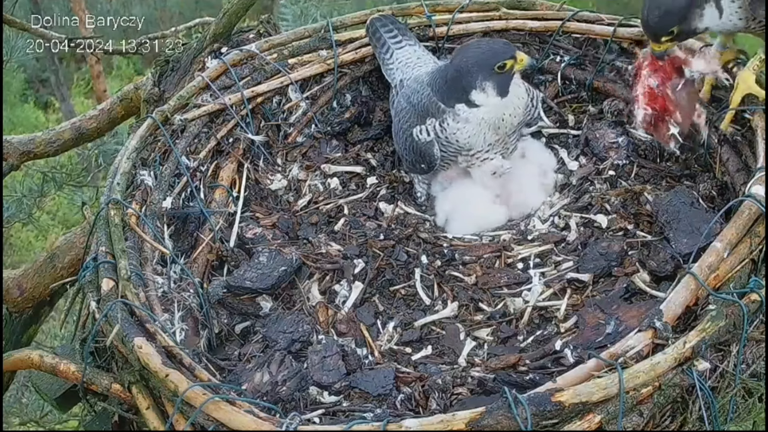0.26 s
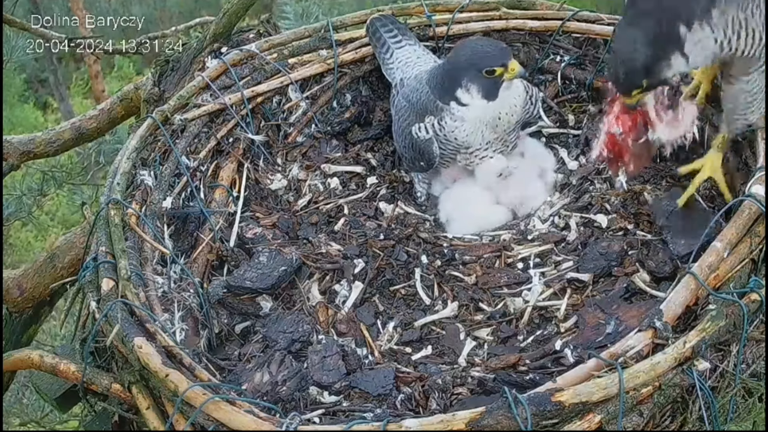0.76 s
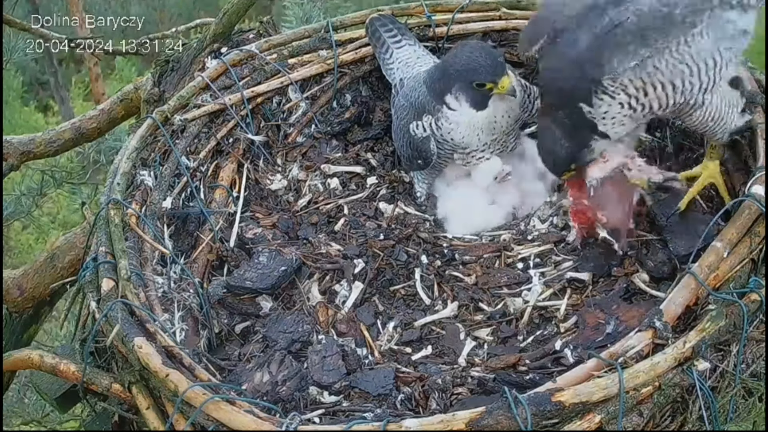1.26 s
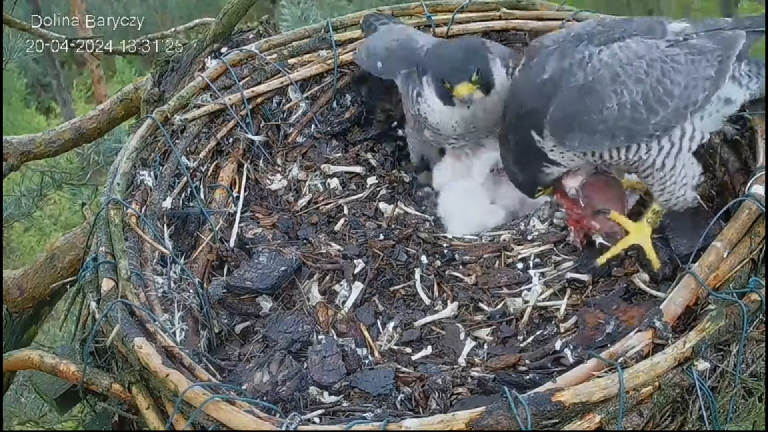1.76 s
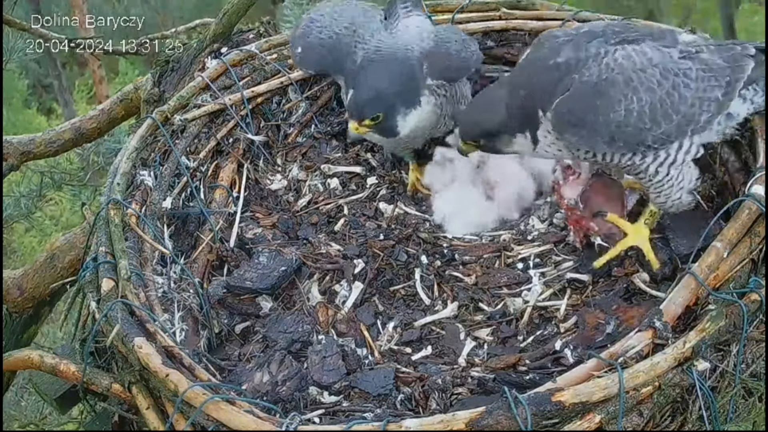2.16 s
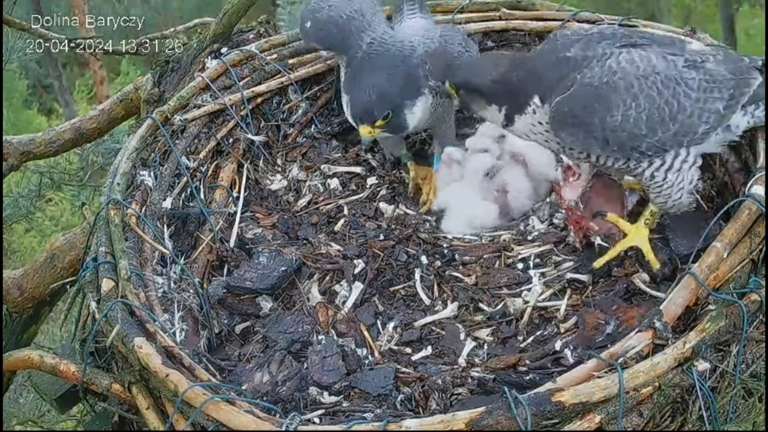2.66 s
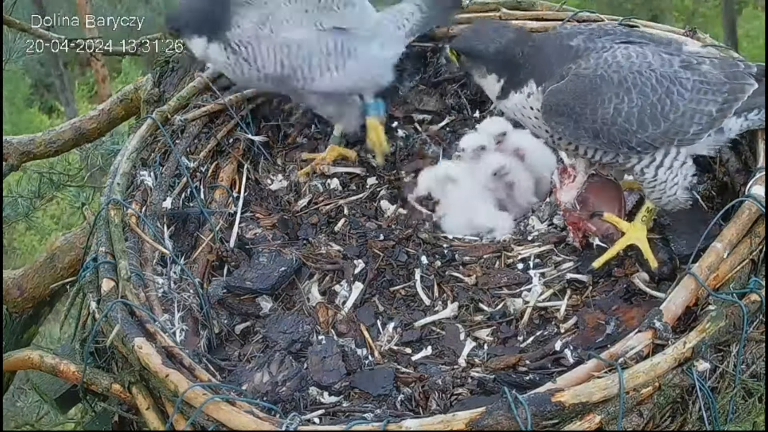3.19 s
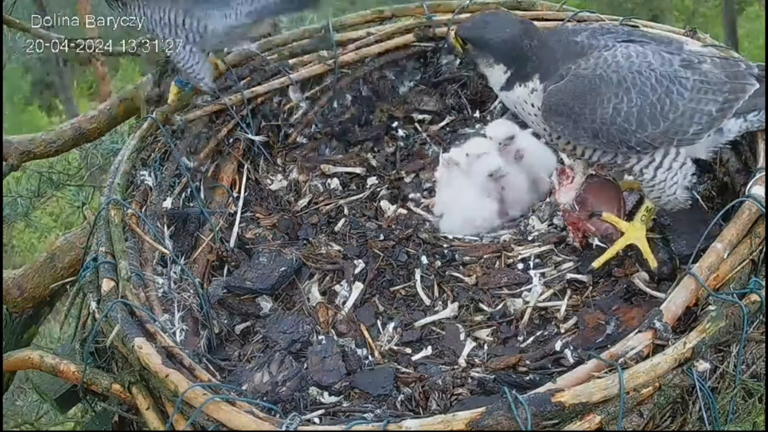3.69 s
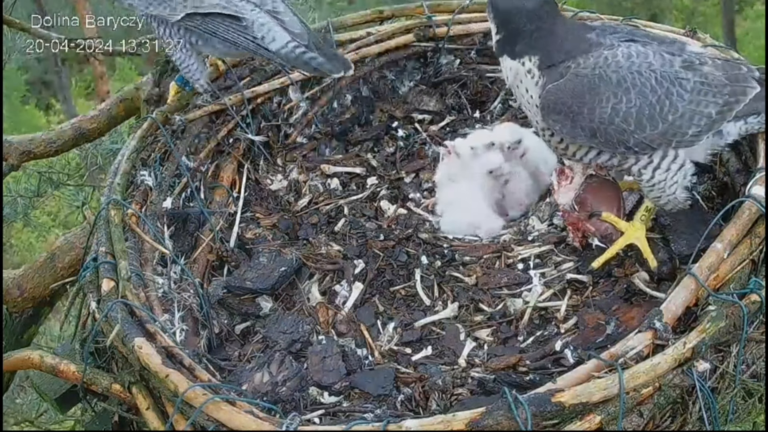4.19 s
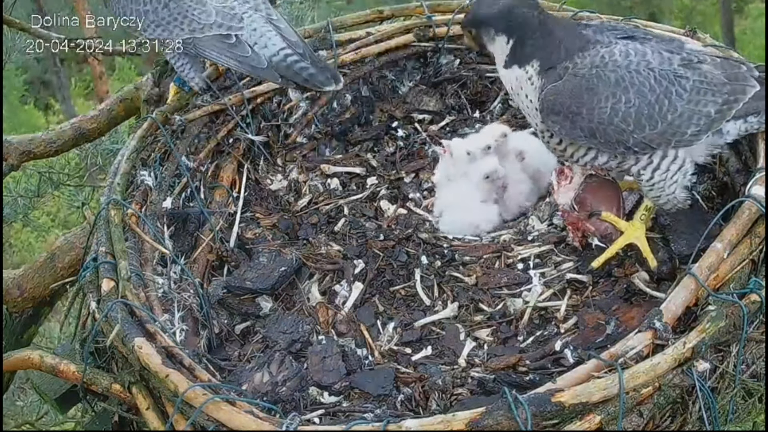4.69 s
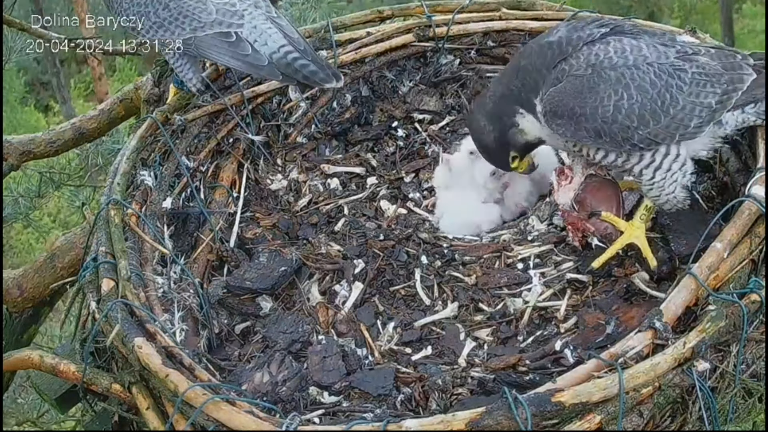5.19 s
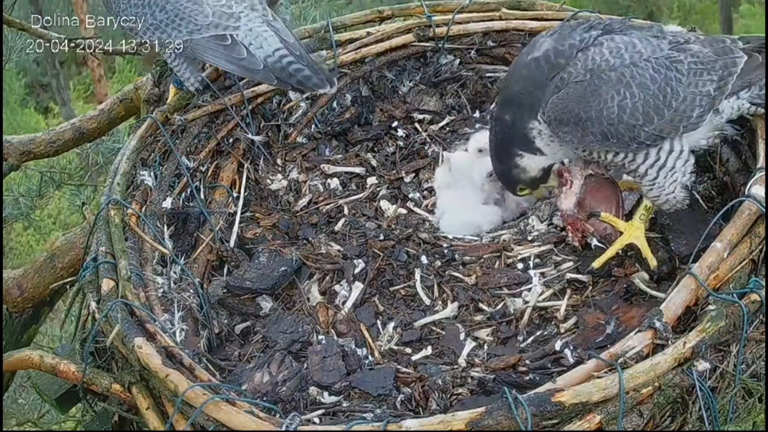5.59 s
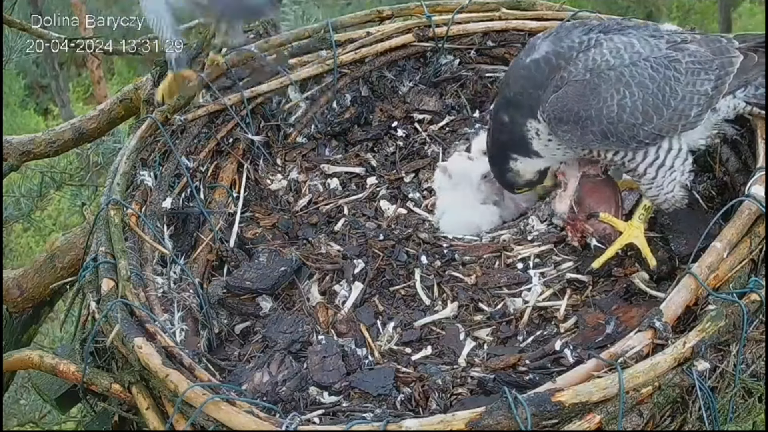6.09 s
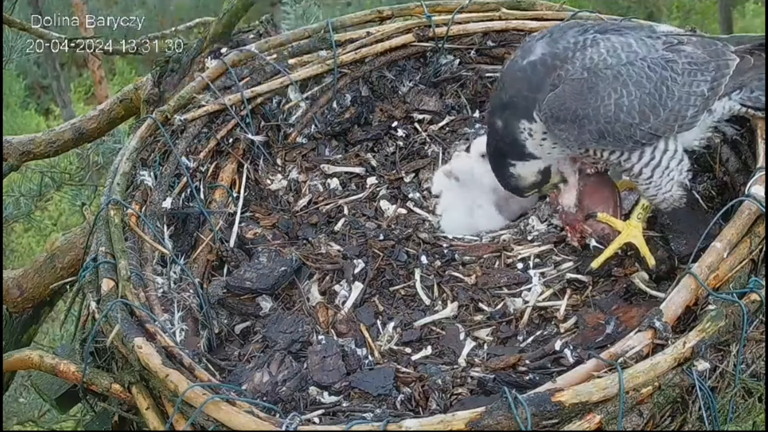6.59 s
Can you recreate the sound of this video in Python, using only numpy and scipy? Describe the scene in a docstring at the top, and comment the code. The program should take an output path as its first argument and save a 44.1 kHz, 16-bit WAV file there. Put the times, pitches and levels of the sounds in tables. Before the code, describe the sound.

Rapid, piercing raptor cries come first, alternating squeaky yelps and low raspy barks, with a soft wail starting among them. After about two seconds the loud calling stops, leaving faint peeps from downy chicks, drooping plaintive whines and a brief feathery rustle. Lumpy wind rumbles and buffets an exposed outdoor microphone near the start and again towards the end, over still, quiet woodland air.

```python
"""Two adult falcons meet at a treetop stick nest: eight sharp calls join thin squeaks, plunging yelps, low barks and creaks.
Harmonic oscillators with unsteady pitch and level make the voices; separate pulses ringing a throat make the creaks.
Four soft long wails, the first beginning among the calls, waver; chicks peep faintly, their pitch bending up or down.
Filtered noise makes brief ticks and longer wing swishes, the lumpy wind and the still air; pressure swings add buffets.
The forest returns a faint echo by convolution with bright scatter and sparse random reflections."""
import sys
import numpy as np
from scipy import signal
from scipy.fft import rfft, irfft
from scipy.io import wavfile
from scipy.ndimage import uniform_filter1d

SR = 44100
rng = np.random.default_rng(int(sys.argv[2]) if len(sys.argv) > 2 else 0)


def unload_audio(sound):
    """Save the sound as a 16-bit wav file, at the path given as the first command line argument."""
    columns = np.transpose(np.atleast_2d(sound))
    # keep every value between -1 and 1, then stretch to whole-number steps
    steps = np.round(np.clip(columns, -1, 1) * 32767)
    wavfile.write(sys.argv[1], SR, steps.astype(np.int16))


N = 302083
TIME = np.arange(N) / SR
CUTOFF_HZ = 15900   # upper limit of the sound

# single pressure swings of air, each with a turbulent wake: time_s, peak_db, pitch_hz, wake_s
BUFFETS = [(0.983, -18.5, 89, .02), (1.437, -35, 138, 0.016), (1.859, -28.5, 70.2, 0.029),
           (1.898, -31.5, 135.6, .03), (2.395, -35.5, 178.9, 0.024), (2.5, -47, 70.2, .12),
           (3.146, -40, 89.5, 0.11), (3.639, -44.5, 109, .014), (4.11, -48, 49.6, 0.062),
           (4.369, -47, 49.7, 0.037), (5.049, -41.5, 79, 0.059), (5.208, -32, 120.3, .03),
           (5.279, -29.5, 188, .02), (5.379, -27.5, 138, .03), (5.569, -26, 143, 0.041),
           (5.73, -25.5, 108.3, .05), (6.031, -20.5, 127.5, .02), (6.26, -20.5, 92, 0.017),
           (6.35, -24.5, 149, 0.036), (6.433, -24, 142, 0.035)]


def from_db(db):
    """Amplitude ratio from the logarithmic decibel scale."""
    return 10 ** (np.asarray(db) / 20)


def rms_one(x):
    """Normalization of a signal to unit mean power."""
    return x / np.sqrt(np.mean(x ** 2) + 1e-20)


def in_time(rows):
    """Linear interpolation of each column of a curve at every sample."""
    s, *columns = np.transpose(rows)
    return [np.interp(TIME, s, column) for column in columns]


def at_hz(points, hz):
    """Spectral gain, interpolated in decibels over logarithmic frequency."""
    f, db = np.transpose(points)
    return from_db(np.interp(np.log(np.maximum(hz, 1)), np.log(f), db))


def response(points, size=4096):
    """Minimum-phase impulse response: folding the cepstrum makes the given spectrum causal."""
    cepstrum = irfft(np.log(at_hz(points, np.fft.rfftfreq(size, 1 / SR))))
    fold = 1 + np.sign(size // 2 - np.arange(size))
    fold[0] = 1
    return irfft(np.exp(rfft(cepstrum * fold)))


def noise(points):
    """Coloured noise of unit power: white noise shaped by a linear filter."""
    colour = response(points)
    white = rng.standard_normal(N + len(colour) - 1)
    return rms_one(signal.fftconvolve(white, colour, "valid"))


def flutter(rate_hz, count, warm_up=4000):
    """Band-limited random modulation: low-passed noise wavers about as fast as the cutoff."""
    low = signal.butter(2, rate_hz, fs=SR, output="sos")
    return rms_one(signal.sosfilt(low, rng.standard_normal(count + warm_up)))[warm_up:]


def fading(count, depth_db, rate_hz):
    """Random amplitude modulation: a gain swells and sinks in decibels."""
    return from_db(depth_db * flutter(rate_hz, count))


def gate(t, start, end, edge):
    """Smooth onset and decay: a product of two tanh steps."""
    opening = 1 + np.tanh((t - start) / edge)
    closing = 1 - np.tanh((t - end) / edge)
    return opening * closing / 4


def syrinx(notes, edge_s, edge_share, jitter, shimmer, rough_hz, rasp_db, half_db, sag_db=20):
    """Harmonic oscillation: irregular vibration shakes pitch and level, adds subharmonics and lets air rasp.

    Note columns: start_s, first_part_s, second_part_s, start_hz, turn_hz, end_hz,
    start_db, turn_db, end_db, overtone_db, roughness. sag_db is overtone gain per octave of sag.
    """
    # how throat and beak pass overtones: frequency_hz, gain_db
    overtones = [(3400, -7), (3850, -5.5), (4350, -14.5), (5000, -19), (5850, -20), (6500, -26.5),
                 (7800, -37), (8700, -44), (11000, -59.5), (16000, -63)]
    # colour of the rasping air and of the half harmonics: frequency_hz, gain_db
    rasp = [(200, -14), (1200, -12), (2500, 7.5), (3900, 4.5), (4700, 0.5), (6000, -9), (8000, -15.5),
            (11000, -29), (16000, -37)]
    voice, air = np.zeros(N), np.zeros(N)
    for start, first, second, hz0, hz1, hz2, db0, db1, db2, overtone_db, rough in notes:
        turn, end = start + first, start + first + second
        span = (TIME > start - .04) & (TIME < end + .04)
        t = TIME[span]
        count = len(t)
        # after the turn the pitch moves quickly, then settles
        settle = 1 - np.interp(t, [turn, end], [1, 0]) ** 2
        hz = np.interp(t, [start, turn], [hz0, hz1]) + (hz2 - hz1) * settle
        shaken_hz = hz * (1 + jitter * rough * flutter(rough_hz, count))
        phase = 2 * np.pi * np.cumsum(shaken_hz) / SR
        opening = gate(t, start, end, edge_s + edge_share * (end - start))
        # overtones need a fully open voice, and each wavers on its own
        upper = np.zeros(count)
        for k in range(2, 8):
            gain = at_hz(overtones, k * hz) * (k * hz < CUTOFF_HZ)
            upper += gain * fading(count, depth_db=3.5, rate_hz=70) * np.sin(k * phase)
        # alternate cycles differ, which puts lines between the harmonics
        between = sum(at_hz(rasp, k * hz / 2) / k * np.sin(k * phase / 2) for k in (1, 3))
        half = rough * from_db(half_db) * fading(count, depth_db=6.0, rate_hz=67) * between
        level = from_db(np.interp(t, [start, turn, end], [db0, db1, db2])) * opening
        # overtones strengthen where the pitch lies below that of the turn
        harsh_db = sag_db * np.clip(np.log2(hz1 / hz), 0, 1)
        wave = np.sin(phase) + half + from_db(overtone_db + harsh_db) * opening * upper
        voice[span] += level * wave * (1 + shimmer * rough * flutter(rough_hz, count))
        air[span] += level * rough
    return voice + from_db(rasp_db) * air * noise(rasp)


def squeak(start, length, hz, db, overtone_db):
    """Frequency glide: rising pitch makes a thin note that is loudest at its turn."""
    turn, rise = .55, .11   # shares of the length and of the pitch
    swell_db, fade_db, rough = 2.5, 4.5, .16
    return (start, turn * length, (1 - turn) * length, hz, hz * (1 + rise * turn), hz * (1 + rise),
            db - swell_db, db, db - fade_db, overtone_db, rough)


def yelp(start, length, hz, db, overtone_db, rough):
    """Register break: the pitch plunges while the level swells, then both hold."""
    drop_ratio, turn, swell_db = 1.2, .5, 9   # turn is a share of the length
    return (start, turn * length, (1 - turn) * length, drop_ratio * hz, hz, hz,
            db - swell_db, db, db, overtone_db, rough)


def bark(start, length, hz, end_hz, db, fade_db, overtone_db, rough, split_db):
    """Onset, sustain and breakup: a soft start, a held sagging voice and a brief inharmonic tone."""
    hold = .59 * length   # before the pitch sags
    swell_db_per_s = 171.5
    # each half of the soft start, with level relative to the bark
    lead_s, lead_swell_db, lead_rough = .006, 6.5, .35
    lead_db = db - 22
    lead = (start - 2 * lead_s, lead_s, lead_s, hz, hz, hz,
            lead_db - lead_swell_db, lead_db, lead_db + lead_swell_db, overtone_db, lead_rough)
    body = (start, hold, length - hold, hz, hz, end_hz,
            db - swell_db_per_s * hold, db, db - fade_db, overtone_db, rough)
    # each half of the closing tone between the harmonics
    split_s, split_fade_db, split_overtones_db, split_rough = .0058, 4.5, -11, .38
    split_hz = 1.47 * end_hz
    split = (start + length - 2 * split_s, split_s, split_s, split_hz, split_hz, split_hz,
             split_db - split_fade_db, split_db, split_db - split_fade_db, split_overtones_db, split_rough)
    return [lead, body, split]


def sharp_calls():
    """Register jumps: one harmonic oscillator passes between squeak, yelp and bark."""
    # thin rising lead-ins: start_s, length_s, start_pitch_hz, level_db, overtones_db
    squeaks = [(0.0, 0.019, 3770, -28, 12.5), (0.438, 0.013, 3474, -24.5, 3),
               (0.972, 0.017, 3350, -24, 6.5), (1.663, 0.038, 3332, -28.5, 9), (2.153, 0.06, 3040, -21, 0)]
    # plunging voice breaks: start_s, length_s, landing_pitch_hz, level_db, overtones_db, roughness
    yelps = [(.025, 0.0062, 2830, -20, -.5, 0.52), (0.466, 0.006, 3100, -8.5, -1, 0.23),
             (.999, 0.012, 2950, -7, 7.5, 0.19), (1.706, 0.0061, 2876, -8.5, -1.5, 0.3),
             (2.203, 0.015, 2747, -9, 1.5, .13)]
    # low voice that holds, sags and splits: start_s, length_s, pitch_hz, end_pitch_hz, level_db,
    # fade_db, overtones_db, roughness, split_tone_db
    barks = [ (.028, 0.014, 1952, 1746, -17.5, 6, -1, 0.05, -18.5),
             (.250, 0.056, 2143, 1850, -9, 5.5, -5, 0.08, -26),
             (0.472, .022, 1966, 1844, -8, 7, -1, .17, -28.5),
             (0.74, 0.055, 2166, 1768, -6, 11, -9, .14, -36.5),
             (1.007, 0.021, 2023, 1832, -7.5, 3.5, -10.5, 0.54, -17),
             (1.319, .038, 2157, 1926, -10.5, -1.5, -4.5, .12, -14),
             (1.712, 0.019, 1900, 1782, -7.5, 3.5, -8.5, 0.21, -14),
             (2.217, 0.012, 1752, 1640, -12, 1.5, 2.5, 0.2, -21)]
    notes = [squeak(*row) for row in squeaks] + [yelp(*row) for row in yelps]
    for row in barks:
        notes += bark(*row)
    return syrinx(notes, edge_s=.0015, edge_share=.008, jitter=.09, shimmer=.15, rough_hz=596,
                  rasp_db=-12.0, half_db=-7.5)


def creaks(unevenness=.059, scatter_db=-1.5, rasp_db=-17, puff_s=.0013, soft_hz=3800):
    """Pulse excitation of a resonator: a slack membrane's separate pulses and puffs ring the throat."""
    # creaks that open or close a call: start_s, length_s, relative_level_db, slowing_octaves
    creak_rows = [(0.041, 0.019, -14.5, 0.98), (0.2213, .018, -17, 0), (0.303, .018, -11.5, .68),
                  (0.492, .019, -12.5, .85), (0.709, 0.018, -12, 0.11), (1.027, .013, -17, 0.54),
                  (1.358, 0.023, -12.5, .6), (1.729, .019, -15, 0.61), (2.23, 0.022, -11.5, 0.89)]
    # how the throat colours pulses and puffs: frequency_hz, gain_db
    creak_colour = [(120, -24.5), (330, 5), (520, -7.5), (750, -1.5), (1550, 3), (1950, -0.5), (2600, 2),
                    (3300, -13.5), (4000, -13), (4800, -26), (7000, -37.5), (16000, -56)]
    mid_rate_hz, fade_db_per_octave = 345, 16.5   # a slackening membrane pulses slower and weaker
    first_db = -7.5   # the first pulse is softer
    clicks = np.zeros(N)
    for start, length, db, slowing in creak_rows:
        s, end = start, start + length
        for slip, force in rng.standard_normal((16, 2)):
            slack = np.interp(s, [start, end], [0, slowing])
            if s < end:
                pulse_db = db + first_db * (s == start) - fade_db_per_octave * slack + scatter_db * force
                clicks[round(s * SR)] = from_db(pulse_db)
            s += np.exp(unevenness * slip) / (mid_rate_hz * 2 ** (slowing / 2 - slack))
    clicks_in = clicks + 1e-18   # a tiny offset keeps the filters out of slow arithmetic
    rounding = signal.butter(4, soft_hz, fs=SR, output="sos")
    pulses = signal.sosfilt(rounding, clicks_in)
    puff_level = signal.lfilter([1], [1, -np.exp(-1 / (puff_s * SR))], clicks_in)
    puffs = puff_level * rng.standard_normal(N)
    throat = response(creak_colour)
    return signal.fftconvolve(pulses + from_db(rasp_db) * puffs, throat / abs(throat).max())[:N]


def wails(jitter=.045, shimmer=1.0, rough_hz=110, waver=.0067, waver_hz=25, level_db=-.97,
          purity=.55, full_db=-55):
    """Additive synthesis: a whine scoops up, wavers and droops while its higher harmonics come and go.

    purity is the overtone loss in dB per dB of fundamental below full_db.
    """
    # held part of each wail, one list per wail: time_s, pitch_hz, relative_level_db
    wail_curves = [
        [(1.06, 2140, -56), (1.152, 2247, -53), (1.276, 2194, -51.5), (1.41, 2040, -60), (1.49, 1933, -61.5)],
        [(3.51, 1807, -62), (3.764, 2055, -60.5), (3.856, 2158, -52), (3.95, 2190, -52), (4.086, 2207, -51),
         (4.17, 2043, -56.5), (4.272, 2080, -51.5), (4.47, 1863, -59.5)],
        [(4.75, 2030, -57.5), (4.844, 2022, -55), (4.912, 2046, -63), (5.01, 2043, -61), (5.154, 1958, -74.5),
         (5.386, 2000, -69), (5.454, 2150, -58.5), (5.575, 1900, -63)],
        [(5.84, 1868, -62), (6.09, 2133, -57.5), (6.136, 2280, -49.5), (6.206, 2237, -53), (6.462, 2238, -47.5),
         (6.615, 1897, -59.5)],
    ]
    # voicing of each wail: scoop_share_of_pitch, upper_harmonics_db
    voicing = [(.05, -2.5), (.2, -1.5), (.11, -13), (0.31, -3.5)]
    # harmonics 3 to 5 relative to the fundamental: frequency_hz, gain_db
    upper_colour = [(4500, -10), (5700, -12.5), (6200, -22.5), (6700, -38), (7500, -40.5), (8700, -30),
                    (10000, -40), (14000, -54)]
    # second harmonic relative to the fundamental, favoured below 4 kHz: frequency_hz, gain_db
    second_colour = [(2900, -8), (3400, -2), (3800, 1), (4000, -5), (4200, -13), (4350, -20), (4550, -21)]
    # moments when the voice cracks and turns hoarse: time_s, added_roughness
    cracks = [(3.72, 0.3), (4.89, 0.22), (5.44, 0.51), (6.13, 0.09), (6.3, 0.16)]
    crack_s, steady_rough = .042, .21
    scoop_s, scoop_db = .012, -3.5   # the voice is weaker while it scoops
    droop, droop_s = .28, .08   # final droop: share of pitch, time
    out = np.zeros(N)
    hoarse = steady_rough + sum(rough * np.exp(-((TIME - s) / crack_s) ** 2) for s, rough in cracks)
    for rows, (depth, bright_db) in zip(wail_curves, voicing):
        start, end = rows[0][0], rows[-1][0]
        span = (TIME > start - .03) & (TIME < end + .03)
        hz, first_db = [column[span] for column in in_time(rows)]
        t = np.clip(TIME[span], start, end)
        scoop = np.exp((start - t) / scoop_s)
        first_db = first_db + scoop_db * scoop
        sag = droop * np.interp(t, [end - droop_s, end], [0, 1]) ** 2
        hz = hz * (1 - depth * scoop) * (1 - sag)
        first_level = from_db(first_db)
        second_level = first_level * at_hz(second_colour, 2 * hz)
        rough, count = hoarse[span], len(hz)
        hz = hz * (1 + waver * flutter(waver_hz, count) + jitter * rough * flutter(rough_hz, count))
        phase = 2 * np.pi * np.cumsum(hz) / SR
        upper = np.zeros(count)
        for k in range(3, 6):
            gain = at_hz(upper_colour, k * hz) * fading(count, depth_db=6.0, rate_hz=7.7)
            upper += gain * np.sin(k * phase)
        # a weak voice is nearly pure
        upper *= from_db(bright_db + purity * np.minimum(first_db - full_db, 0))
        tone = first_level * (fading(count, depth_db=2.5, rate_hz=35) * np.sin(phase) + upper)
        tone += second_level * fading(count, depth_db=2.0, rate_hz=22) * np.sin(2 * phase)
        opening = gate(TIME[span], start, end, edge=.002)
        out[span] += tone * opening * (1 + shimmer * rough * flutter(rough_hz, count))
    return np.sqrt(2) * from_db(level_db) * out


def peep(start, length, hz, turn_hz, end_hz, db, overtone_db):
    """Joint frequency and amplitude modulation: pitch bends up or down at a turn where the level peaks."""
    turn, fade_db, rough = .68, 1, .25   # turn is a share of the length
    return (start, turn * length, (1 - turn) * length, hz, turn_hz, end_hz,
            db - fade_db, db, db - fade_db, overtone_db, rough)


def chicks():
    """Harmonic oscillation at low level: the chicks peep with slower shaking and less rasp."""
    # start_s, length_s, start_pitch_hz, turn_pitch_hz, end_pitch_hz, level_db, overtones_db
    peeps = [ (2.345, 0.34, 1543, 1700, 1533, -74, -0.5), (3.05, .5, 1703, 1804, 1815, -76, -17),
             (3.28, .45, 2437, 2730, 2360, -71, -19.5), (4.461, 0.24, 1596, 1550, 1607, -69.5, -7),
             (4.558, 0.062, 2215, 2250, 2147, -67.5, 1), (5.247, .41, 1830, 1640, 1797, -63.5, -15),
             (5.66, 0.069, 2473, 2500, 2350, -69, -1), (5.676, 0.101, 1566, 1780, 1425, -60.5, -13.5),
             (6.174, 0.18, 4170, 4170, 4330, -66.5, -11), (6.671, 0.042, 4143, 3800, 3770, -65.5, -3),
             (6.776, .07, 4110, 3916, 4020, -77.5, 0)]
    return syrinx([peep(*row) for row in peeps], edge_s=.006, edge_share=.03, jitter=.07, shimmer=1.2,
                  rough_hz=45, rasp_db=-22, half_db=-22)


def brushes(grain_db=5.0, grain_hz=90):
    """Friction noise: randomly modulated noise gives brief ticks and longer wing swishes."""
    # brief ticks, then from 4.1 s longer wing swishes: centre_s, width_s, level_db
    contacts = [(0.633, .003, -75.5), (1.204, 0.0022, -56), (3.713, 0.0039, -58.5), (4.102, 0.014, -45.5),
                (4.141, 0.023, -61), (4.251, 0.026, -56), (4.289, 0.022, -54.5), (4.388, 0.021, -61.5)]
    # friction spectrum: frequency_hz, gain_db
    brush_colour = [(150, -1.5), (400, 6), (800, 4.5), (1300, -2), (2300, 2.5), (4000, -5.5), (7000, -18.5),
                    (11000, -33), (16000, -39)]
    level = sum(from_db(db) / (1 + ((TIME - s) / width) ** 2) ** 2 for s, width, db in contacts)
    # low, middle and high bands waver independently
    grains = np.zeros(N)
    for band_hz in ([100, 1200], [1200, 3500], [3500, 15000]):
        band = signal.butter(2, band_hz, "band", fs=SR, output="sos")
        grains += signal.sosfilt(band, noise(brush_colour)) * fading(N, grain_db, grain_hz)
    return level * rms_one(grains)


def forest(x, near_db=-22, near_t60=.12, far_db=-40, far_t60=.62, trunks_per_s=120):
    """Scattering and reverberation: quick bright scatter from twigs, then faint separate trunk echoes."""
    t = TIME[:SR]
    near, far = rng.standard_normal((2, SR)) * from_db(-60 * t / np.array([[near_t60], [far_t60]]))
    far = far * (rng.random(SR) < trunks_per_s / SR) * (t > .025)
    bright = signal.butter(1, 3000, "high", fs=SR, output="sos")
    middle = signal.butter(1, [3000, 6000], "band", fs=SR, output="sos")
    near = signal.sosfilt(bright, rms_one(near))
    far = signal.sosfilt(middle, rms_one(far))
    echo = (from_db(near_db) * near + from_db(far_db) * far) / np.sqrt(SR)
    return signal.fftconvolve(x, echo)[:N]


def wind_strength():
    """Power addition of uncorrelated turbulence: calm air, two blustery spells and buffet wakes."""
    # blustery spells, one list per spell: time_s, relative_level_db
    spells = [
        [(0.13, -71), (0.176, -44), (0.24, -45.5), (0.272, -59), (0.312, -33.5), (0.384, -49), (0.878, -27.5),
         (0.946, -46), (0.984, -26.5), (1.064, -39), (1.45, -40.5), (1.476, -79), (1.51, -42), (1.65, -57.5)],
        [(5.12, -72), (5.216, -29), (5.336, -44.5), (5.384, -33), (5.658, -42), (5.76, -27.5), (5.846, -37.5),
         (6.038, -25.5), (6.096, -35.5), (6.24, -31), (6.514, -34), (6.572, -40.5), (6.596, -59), (6.85, -66.5)],
    ]
    calm_db, spell_fade_db_per_s = -80, 153   # spells die away at both ends
    wake_db, wake_rise_s = -10.5, .025   # wake level is relative to its buffet
    power = from_db(calm_db) ** 2
    for rows in spells:
        outside_s = np.abs(TIME - np.clip(TIME, rows[0][0], rows[-1][0]))
        power = power + from_db(in_time(rows)[0] - spell_fade_db_per_s * outside_s) ** 2
    for s, db, _, wake_s in BUFFETS:
        distance = np.maximum((s - TIME) / wake_rise_s, (TIME - s) / wake_s)
        wake = np.exp(-np.minimum(distance, 20))
        power = power + (from_db(db + wake_db) * wake) ** 2
    return np.sqrt(power)


def wind(level_db=-.5, lump_db=4.0, lump_hz=35, even_s=.06):
    """Turbulent pressure: lumpy low noise, with single eddies that push and pull the diaphragm once."""
    # turbulence spectrum: frequency_hz, gain_db
    wind_colour = [(13, -33.5), (22, -3.5), (44, 5), (113, -1), (232, -14.5), (429, -29), (573, -39),
                   (657, -35), (1010, -51), (1300, -46.5), (1690, -79), (2860, -120)]
    eddies = noise(wind_colour) * fading(N, lump_db, lump_hz)
    # even out the slow level, so that the wind strength alone sets it
    eddies = eddies / np.sqrt(uniform_filter1d(eddies ** 2, int(even_s * SR)) + 1e-9)
    low = signal.butter(4, 1300, fs=SR, output="sos")
    out = signal.sosfilt(low, from_db(level_db) * wind_strength() * eddies)
    for s, db, hz, _ in BUFFETS:
        u = 2 * np.pi * hz * (TIME - s)
        out -= from_db(db) * u * np.exp(np.maximum((1 - u ** 2) / 2, -60))
    return out


def still_air(level_db=-70):
    """Stationary random pressure: steady coloured noise stands for still forest air."""
    # background spectrum: frequency_hz, gain_db
    air_colour = [(25, 6.5), (80, -4.5), (160, -15), (500, -11.5), (800, -10.5), (1700, -15), (2500, -19.5),
                  (4000, -27.5), (5200, -32), (15500, -39)]
    return from_db(level_db) * noise(air_colour)


def scene():
    """Superposition: birds, wind and forest add at one microphone, alike in both channels."""
    adults = sharp_calls() + creaks() + wails()
    nest = adults + chicks() + brushes()
    mono = nest + forest(nest) + wind() + still_air()
    return np.array([mono, mono])


def record(dry):
    """Saturation and band limiting: the loudest peaks round off below a ceiling and the top treble is cut."""
    ceiling = .68
    rounded = dry / (1 + (dry / ceiling) ** 10) ** (1 / 10)
    low = signal.ellip(10, .05, 70, CUTOFF_HZ, fs=SR, output="sos")
    return signal.sosfiltfilt(low, rounded)


dry = scene()
out = record(dry)
unload_audio(out)
```